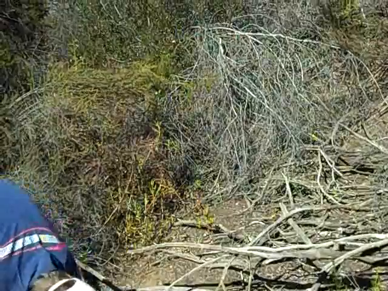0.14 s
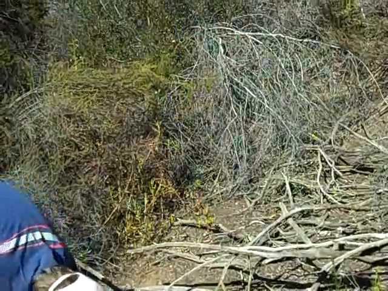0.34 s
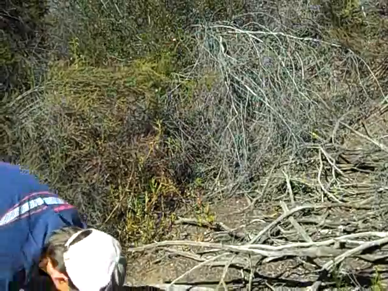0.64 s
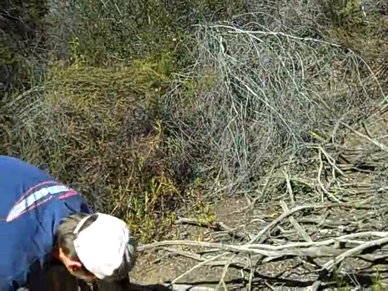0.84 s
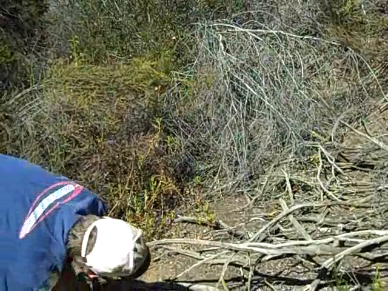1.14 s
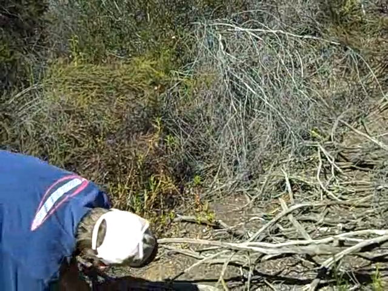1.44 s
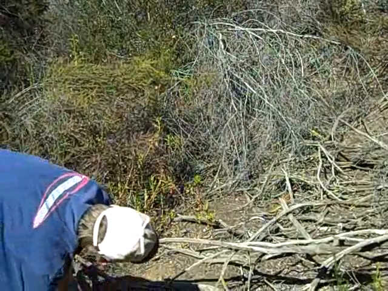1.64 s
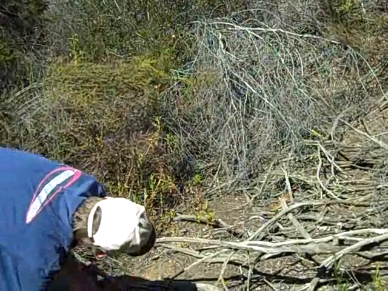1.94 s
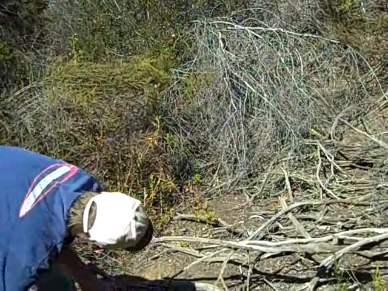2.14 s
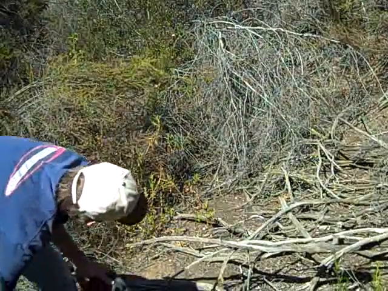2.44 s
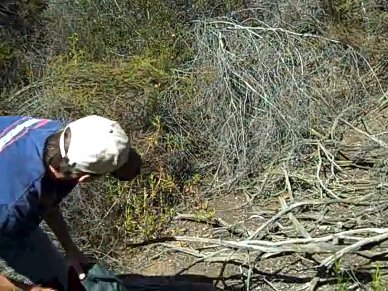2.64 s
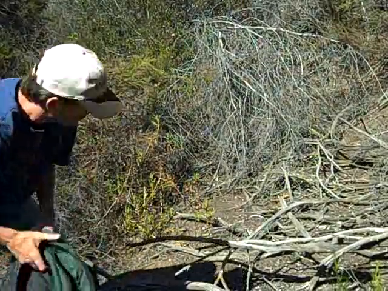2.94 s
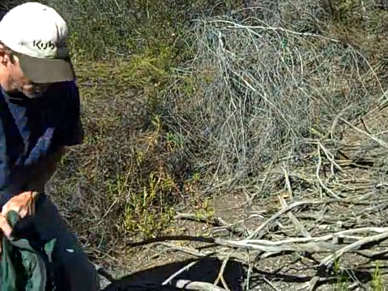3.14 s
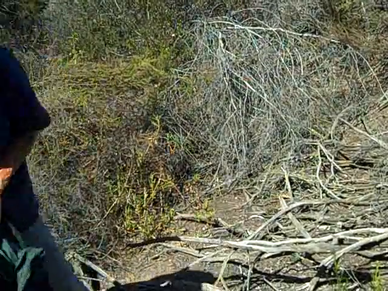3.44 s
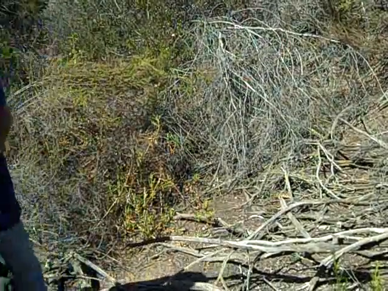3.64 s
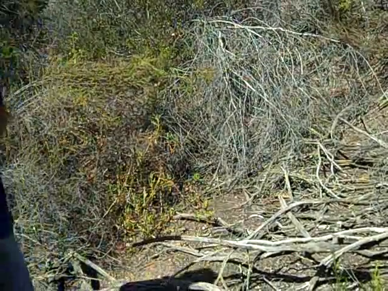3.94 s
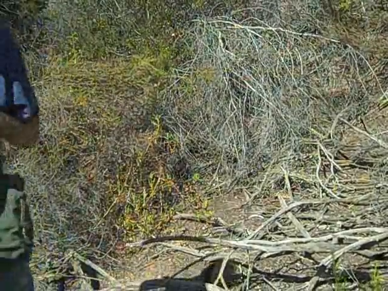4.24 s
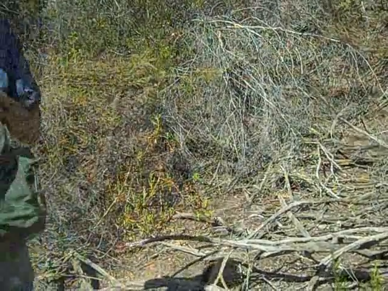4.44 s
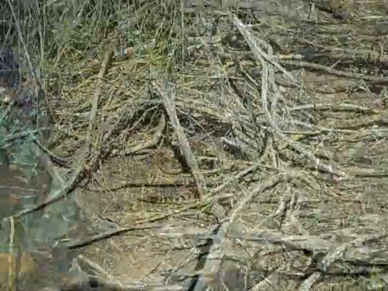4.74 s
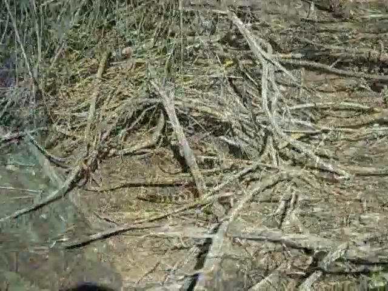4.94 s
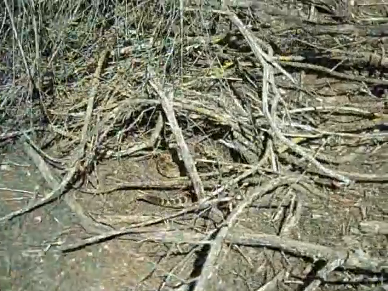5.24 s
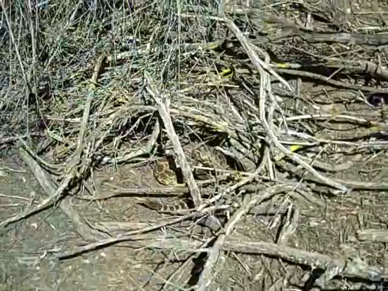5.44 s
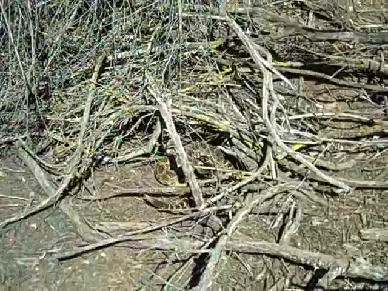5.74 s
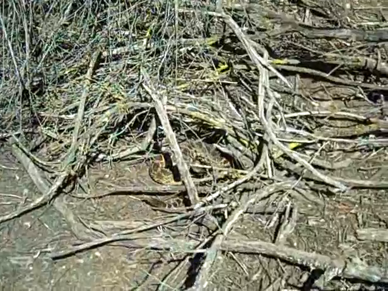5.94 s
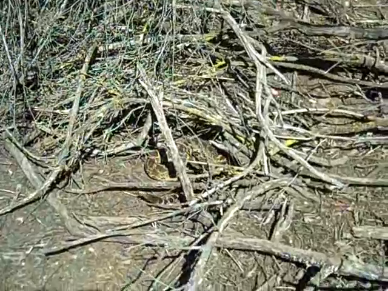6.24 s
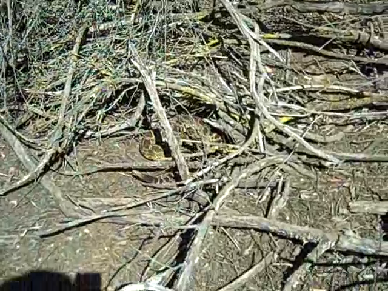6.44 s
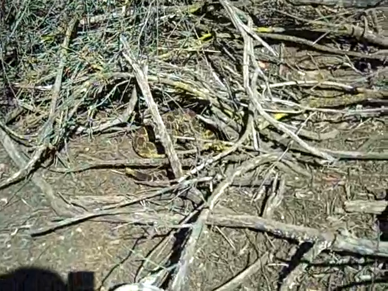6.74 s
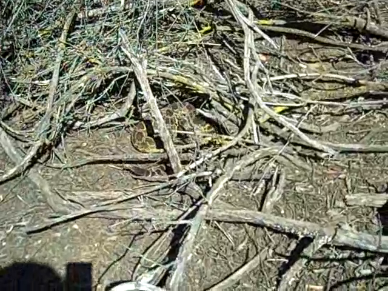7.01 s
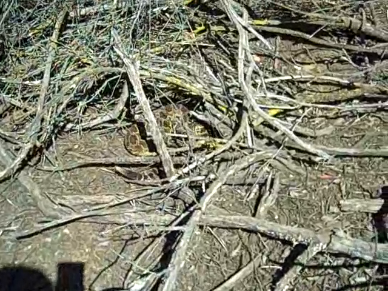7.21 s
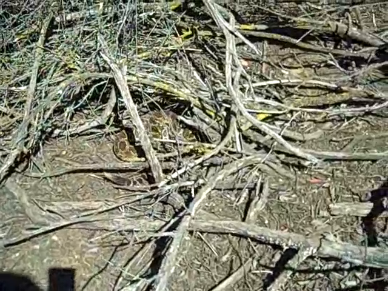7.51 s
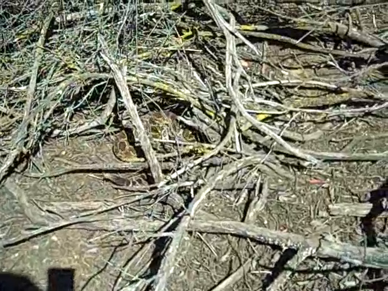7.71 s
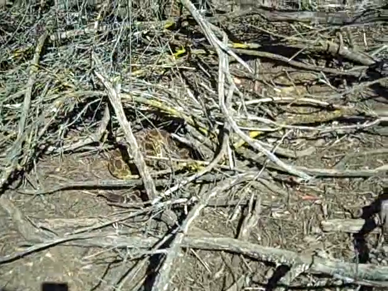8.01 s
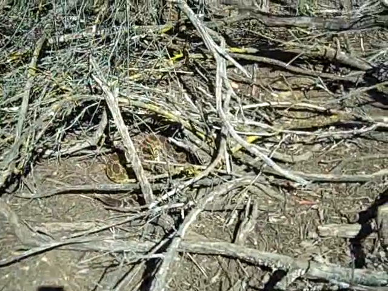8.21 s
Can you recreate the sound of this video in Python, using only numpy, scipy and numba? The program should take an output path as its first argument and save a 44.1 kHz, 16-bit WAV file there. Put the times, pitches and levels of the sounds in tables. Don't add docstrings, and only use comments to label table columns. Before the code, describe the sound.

A rattlesnake's warning rattle runs throughout, a dry, bright, sizzling buzz of hollow clicks too fast to count. Someone shifts nearby: a branch knocks, litter crunches and wood squeaks briefly, then after a calmer gap come loud sharp snaps and ticks. Later the rattle grows stronger and clearer, nearly alone. Close outdoor sound on a small microphone, with faint rumble and hiss.

```python
import sys
import numpy as np
from scipy import signal
from scipy.fft import rfft, irfft
from scipy.io import wavfile
from scipy.ndimage import uniform_filter1d, map_coordinates
from numba import njit

SR = 44100
rng = np.random.default_rng(int(sys.argv[2]) if len(sys.argv) > 2 else 0)


def file_out(sig):
    cols = np.atleast_2d(sig).T
    lim = np.clip(cols, -1, 1)
    pcm = np.round(lim * 32767).astype(np.int16)
    wavfile.write(sys.argv[1], SR, pcm)


def attenuation_scalar(level_db):
    decades = np.asarray(level_db, float) / 20
    return 10 ** decades


N = 369116

# freq_hz, level_db (per Hz)
AIR_COLOUR = [(12, -47), (20, -2.5), (115, -13), (161, -17.5), (484, -11), (600, -18.5), (2200, -4),
              (4840, -63)]
AIR_DB = -61.5

# peak_s, level_db, centre_hz, fade_s
SCUFFS = [(1.2, -48.5, 1500, 0.034), (1.451, -63, 1400, 0.29), (1.55, -50.5, 1910, 0.049),
          (1.616, -45, 2300, .06), (1.82, -50, 1310, 0.078), (2.02, -61, 900, 0.11),
          (3.4, -59.5, 1300, 0.32), (3.564, -38, 8500, 0.014), (3.59, -52.5, 1390, .12),
          (3.868, -46.5, 2840, .035), (4.24, -52.5, 2400, 0.09), (4.33, -56.5, 2010, .12)]
SCUFF_RISE = 0.62

SQUEAK_S, SQUEAK_LENGTH_S, SQUEAK_EDGE_S = 1.598, 0.022, 0.0035
SQUEAK_HZ, SQUEAK_SAG_HZ_PER_S, SQUEAK_DB = 1720, 5600, -37

# start_s, peak_db, wood_hz, crack_db (relative), thump_db (relative)
TWIGS = [(1.164, -51, 2210, -10, -20), (1.2125, -50, 990, 0, -8), (1.552, -38, 2500, -8, -19),
         (1.832, -46, 1150, -12, -17), (1.971, -42, 484, -12, -9), (3.589, -45, 2570, -10, -9),
         (3.82, -44, 520, -10, 2), (3.8405, -31, 6500, 4.5, -17), (3.862, -26.5, 3110, -10, -24),
         (4.06, -47, 1200, -8, -12), (4.141, -42, 453, 3, -10), (4.2185, -33.5, 6060, 4, -28),
         (4.241, -30, 3000, -2, -14), (4.319, -33.5, 6500, 0, -30)]
# start_s, peak_db, wood_hz, crack_db (relative), thump_db (relative)
TICKS = [(1.3456, -32.5, 3040, 10, 1), (2.026, -35, 940, 2, -15), (3.201, -36, 1500, -6, -12),
         (3.573, -39.5, 1000, 11, 17), (3.8405, -39, 1200, 15, 16.5), (3.863, -27, 4700, -4, -18),
         (3.949, -34, 1310, 9, -17), (4.236, -30, 3400, 2, -24), (4.2402, -25, 4300, 1, -9),
         (4.464, -40, 746, -3, -16), (4.507, -27, 702, -3, -29), (6.94, -37.5, 706, -8, -6),
         (8.268, -36.5, 600, -11, -14)]
TWIG_RING_S, TICK_RING_S = 0.00362, 0.0011

# wood_hz, peak_db, ring_s, crack_db (relative), thump_db (relative)
KNOCK = [
    (217, -39, 0.0054, -30, -30),
    (790, -34, 0.0053, -30, -30),
    (1200, -23, 0.0034, -22, -23),
    (1780, -25, .0028, -30, -30),
    (2500, -34, .002, -30, -30),
]
# wood_hz, peak_db, ring_s, crack_db (relative), thump_db (relative)
BREAK = [
    (1630, -22.5, 0.00257, -8, -3),
    (3700, -25, 0.0033, -20, -30),
    (8000, -20, 0.0038, 1.5, -30),
]
KNOCK_S, BREAK_S = 1.1915, 3.5518

# start_s, turns_hz
SWING = [
    (0, 136.4),
    (.9, 140.2),
    (2, 138.3),
    (3.1, 137.6),
    (4.1, 135.4),
    (4.6, 136.2),
    (6, 135.1),
    (6.4, 133.7),
    (7.2, 132.9),
    (8.37, 133.1),
]
# start_s, level_db, main_ring_hz, facing_db, leaf_dulling_db
RATTLE = [(0, -44.5, 5900, -1.5, -1.5), (.4, -46, 6050, -3, -0.5), (.6, -42.5, 5850, 1, 4),
          (.93, -43, 5600, -1.5, 1), (1.14, -45, 5900, -2, -2.5), (1.3, -44.5, 6340, -3, 3.5),
          (1.52, -43, 6230, 0, 2), (1.65, -39, 6200, 2.5, -0.5), (1.93, -42.5, 5900, -1.5, 0.5),
          (2.3, -40, 6080, 2, 1), (2.65, -41, 5720, 1.5, 0.5), (2.95, -40, 5660, 1, 0),
          (3.7, -41.5, 5730, 0.5, -0.5), (4.45, -44.5, 6120, -1.5, -0.5), (5, -40, 5900, -1.5, 0.5),
          (5.75, -36, 5920, 0.5, 0), (7.2, -37, 6000, 1, -0.5), (8.37, -39.5, 6000, 0.5, -1)]

# centre (Hz), pitch spread (0-1), ring length (cycles)
SHOULDER, LOW_RING = (4743, 0.098, 3.6), (3713, 0.19, 3.6)
THUD, EDGE_RING = (2060, 0.52, 0.74), (12430, 0.084, 7.1)
GROUND = (460, 0.55, 1.46)
MAIN_CYCLES, UPPER, TOP = 6.5, (0.081, 7.5), (0.061, 7.9)
EARLY_UPPER_HZ, UPPER_HZ, TOP_RING_HZ, DRIFT = 7620, 8230, 10286, 0.014
LOW_DB, SHOULDER_DB, UPPER_DB, TOP_DB = -11, -8, -2.5, -4
THUD_DB, EDGE_DB, GROUND_DB, SWAY_DB = -10.5, -4.5, -21.5, 0.6
LOW_DB_PER_KHZ = -3.5
SQUARE_HZ = 5900
SPREAD, NARROW_PER_KHZ, NARROWEST, WIDEST = 0.107, 0.068, 0.03, 0.13
NEARER_S, FAR_REST_DB, NEAR_REST_DB = 5.15, -6.5, -9.5
SHIFT_S, CLEAR_S, EARLY_THUD_DB, EARLY_EDGE_DB = 1.17, 2.15, -1, 2
SCREEN_DB, SCREEN_NARROWS = -1, 0.033

# delay_ms, level_db
BRUSH = [
    (.75, -22),
    (1.12, -22),
    (1.65, -25),
    (2.3, -23),
    (3.3, -25),
]
BRUSH_DRIFT_MS = 0.09


def level(x, db):
    return x * attenuation_scalar(db) / np.sqrt(np.mean(x ** 2))


def curve(table):
    s, *columns = np.transpose(table)
    return [np.interp(np.arange(N) / SR, s, column) for column in columns]


def fade(start_s, end_s):
    return np.interp(np.arange(N) / SR, [start_s, end_s], [1, 0])


def wander(hold_s):
    hold = int(hold_s * SR)
    smooth = uniform_filter1d(rng.standard_normal(N), hold)
    return level(uniform_filter1d(smooth, hold), 0)


@njit
def grains(s, hz, cycles, size):
    y = np.zeros(N)
    for k in range(len(s)):
        decay = hz[k] / cycles[k] / SR * 1.4
        turn = np.exp(2j * np.pi * hz[k] / SR - decay)
        start = int(s[k] * SR)
        late = start - s[k] * SR + 1
        z = 2 * size[k] * turn ** late
        rise, rise_step = np.exp(-3 * decay * late), np.exp(-3 * decay)
        for i in range(max(start + 1, 0), min(N, start + int(7 / decay))):
            y[i] += (1 - rise) * z.imag
            z *= turn
            rise *= rise_step
    return y


def air():
    hz, db = np.transpose(AIR_COLOUR)
    bins_hz = np.arange(N // 2 + 1) * SR / N
    colour = attenuation_scalar(np.interp(np.log(bins_hz + 1), np.log(hz), db))
    noise = irfft(rfft(rng.standard_normal(N)) * colour, N)
    swell = level(uniform_filter1d(rng.standard_normal(N), 6000), 0)
    return level(noise * attenuation_scalar(0.78 * swell), AIR_DB)


def scuff(count=1400):
    out = np.zeros(N)
    for peak_s, db, hz, fade_s in SCUFFS:
        place, pitch_a, size, pitch_b = rng.random((count, 4)).T
        along = 2 * place - 1
        s = peak_s + 1.6 * fade_s * along * np.where(along < 0, SCUFF_RISE, 1)
        pitch = np.minimum(hz * np.exp(1.44 * (pitch_a + pitch_b - 1)), 0.45 * SR)
        size_db = -2.5 * np.log(size) - 13.7 * np.abs(along)
        crunch = grains(s, pitch, 2.0 + 0 * s, attenuation_scalar(size_db) * pitch ** 0.75)
        sounding = crunch[crunch != 0]
        out += crunch / np.sqrt(np.mean(sounding ** 2)) * attenuation_scalar(db - 2)
    return out


def squeak():
    t = np.arange(N) / SR - SQUEAK_S
    shape = np.clip(np.minimum(t, SQUEAK_LENGTH_S - t) / SQUEAK_EDGE_S, 0, 1)
    wobble = 1 + 1.5 * uniform_filter1d(rng.standard_normal(N), 60)
    tone = np.sin(2 * np.pi * t * (SQUEAK_HZ - SQUEAK_SAG_HZ_PER_S * t / 2))
    return shape * attenuation_scalar(SQUEAK_DB) * wobble * tone


def twigs():
    snaps = [(*row, TWIG_RING_S) for row in TWIGS]
    snaps += [(*row, TICK_RING_S) for row in TICKS]
    for s, branch in ((KNOCK_S, KNOCK), (BREAK_S, BREAK)):
        snaps += [(s, db, hz, crack_db, thump_db, ring_s) for hz, db, ring_s, crack_db, thump_db in branch]
    out = np.zeros(N)
    t = np.arange(4096) / SR
    modes = np.array([0.985, 1.37, 0.922, 1.45])
    shares = np.array([0.63, -0.37, 0.2, 0.35])
    ground = np.exp(-t / 0.0031) * np.sin(2 * np.pi * 190 * t)
    thump = np.exp(-t / 0.0001) + 0.017 * ground
    for s, db, hz, crack_db, thump_db, ring_s in snaps:
        ring_s = max(ring_s, 0.0004)
        slips = s + ring_s * np.arange(len(modes)) / 9
        cycles = np.maximum(1.5, 0.81 * ring_s * hz * modes)
        out += attenuation_scalar(db) * grains(slips, hz * modes, cycles, shares)
        burst = 0.5 * np.exp(-(t / ring_s) ** 2) + 0.1 * np.exp(-t / ring_s / 4)
        fibres = rng.standard_normal(len(t)) * burst
        i = int(s * SR)
        out[i:i + len(t)] += attenuation_scalar(db + crack_db) * fibres + attenuation_scalar(db + thump_db) * thump
    return out


def tail_knocks(count=36, lead=-0.3, hold=0.36, onset=0.14, bunch=0.39, jitter=0.0402):
    turns = np.cumsum(curve(SWING)[0]) / SR
    turn_count = int(turns[-1]) + 2
    turn = np.repeat(np.arange(turn_count), count)
    place = np.tile(np.arange(count) / count, turn_count) - 0.5
    place = place + jitter * rng.standard_normal(len(turn))
    s = np.interp(turn + place, turns, np.arange(N) / SR, -1, 99)
    rest_db = np.interp(s, [NEARER_S - 0.4, NEARER_S + 0.4], [FAR_REST_DB, NEAR_REST_DB])
    off_turn = np.maximum((lead - place) / onset, (place - lead - hold) / bunch)
    graze_db = rest_db * np.clip(off_turn, 0, 1.4) ** 2
    turn_db = 0.19 * np.repeat(rng.standard_normal(turn_count), count)
    uneven_db = 0.33 * (-1.0) ** turn
    return s, turn_db + uneven_db + graze_db


def rattle(knock_db=2.0, own_db=1.5):
    s, force_db = tail_knocks()
    hardness = rng.standard_normal(len(s))
    force_db = force_db + knock_db * hardness
    at = np.clip((s * SR).astype(int), 0, N - 1)
    main_db, main_hz, facing_db, tilt_db = curve(RATTLE)
    early = fade(SHIFT_S, SHIFT_S + 0.1)
    screened = (1 - early) * fade(CLEAR_S - 0.2, CLEAR_S + 0.17)

    khz = (main_hz - SQUARE_HZ) / 1000
    rest = main_db - facing_db
    main_spread = SPREAD - NARROW_PER_KHZ * khz - SCREEN_NARROWS * screened
    main_spread = np.clip(main_spread, NARROWEST, WIDEST)
    upper_hz = UPPER_HZ + early * (EARLY_UPPER_HZ - UPPER_HZ)
    upper_hz = upper_hz * (1 + DRIFT * wander(0.21))
    top_hz = TOP_RING_HZ * (1 + DRIFT * wander(0.21))
    low_db = rest + LOW_DB + LOW_DB_PER_KHZ * khz * (1 - early)
    top_db = rest + TOP_DB - tilt_db
    rings = [((main_hz[at], main_spread[at], MAIN_CYCLES), main_db),
             (SHOULDER, rest + SHOULDER_DB + SCREEN_DB * screened),
             (LOW_RING, low_db),
             (THUD, low_db + THUD_DB + EARLY_THUD_DB * early),
             ((upper_hz[at], *UPPER), rest + UPPER_DB + tilt_db / 2),
             ((top_hz[at], *TOP), top_db),
             (EDGE_RING, top_db + EDGE_DB + EARLY_EDGE_DB * early),
             (GROUND, low_db + GROUND_DB)]
    out = np.zeros(N)
    for (hz, spread, cycles), db in rings:
        detune, own = rng.standard_normal((2, len(s)))
        pitch = np.minimum(hz * np.exp(spread * detune), 0.45 * SR)
        size = np.sign(detune * hardness) * attenuation_scalar(force_db + own_db * own)
        ring = level(grains(s, pitch, cycles + 0 * s, size), 0)
        out += ring * attenuation_scalar(db + SWAY_DB * wander(0.061))
    return out


def brush(x):
    now = np.arange(N)
    out = x.copy()
    for ms, db in BRUSH:
        delay = (ms + BRUSH_DRIFT_MS * wander(0.58)) * SR / 1000
        out += attenuation_scalar(db) * map_coordinates(x, [now - delay], mode="mirror")
    return out


def scene():
    mix = air() + scuff() + squeak() + twigs() + brush(rattle())
    return mix[None]


def band_limit(x):
    return signal.sosfilt(signal.butter(12, 13250, fs=SR, output="sos"), x)


def record(dry):
    top_cut = signal.ellip(10, 0.2, 70, 13310, fs=SR, output="sos")
    mix = signal.sosfilt(top_cut, dry) - 0.0005
    return band_limit(mix)


dry = scene()
out = record(dry)
file_out(out)
```